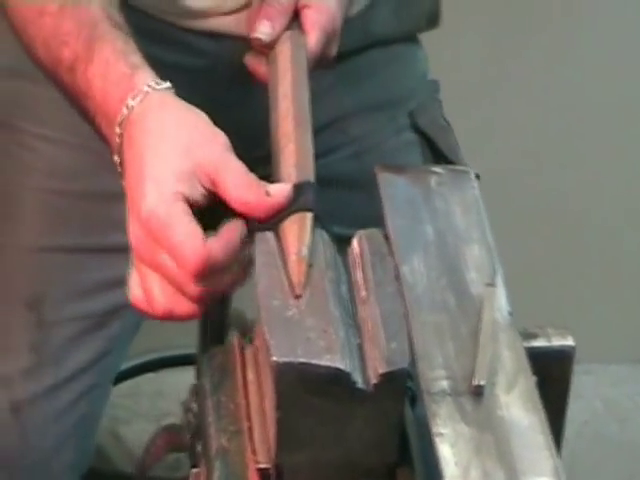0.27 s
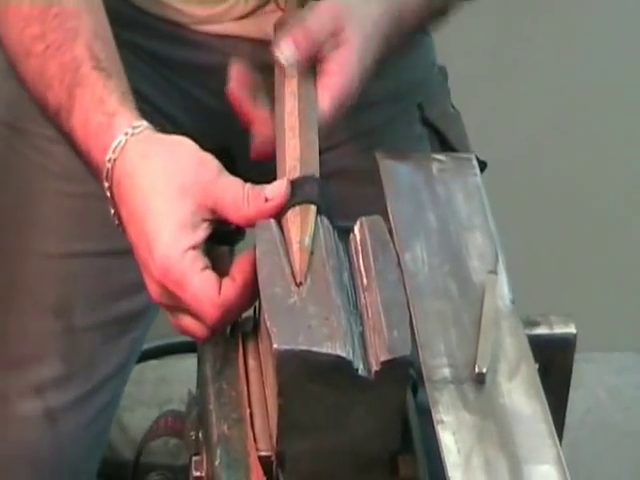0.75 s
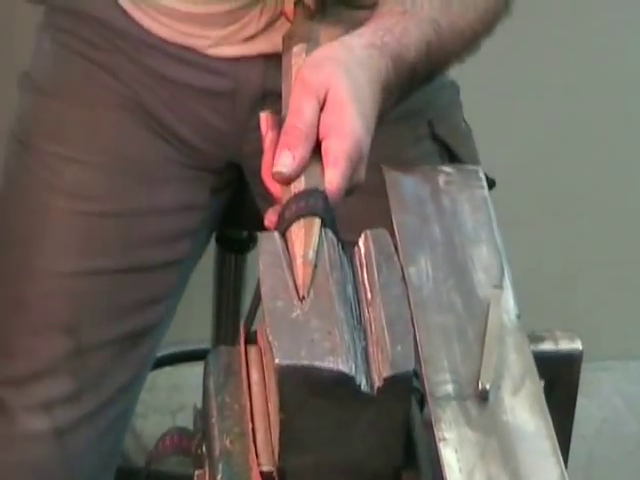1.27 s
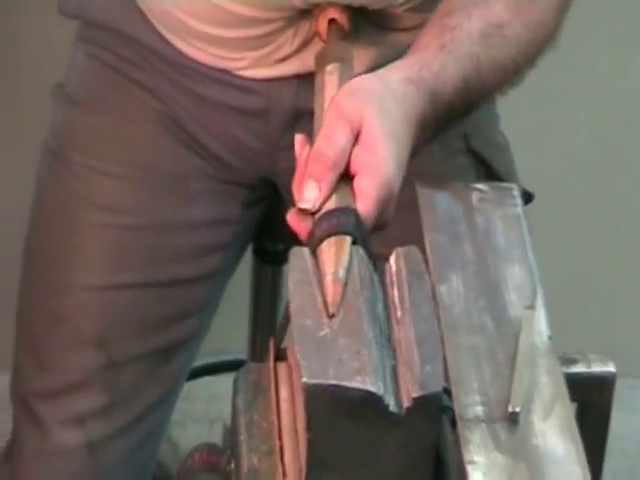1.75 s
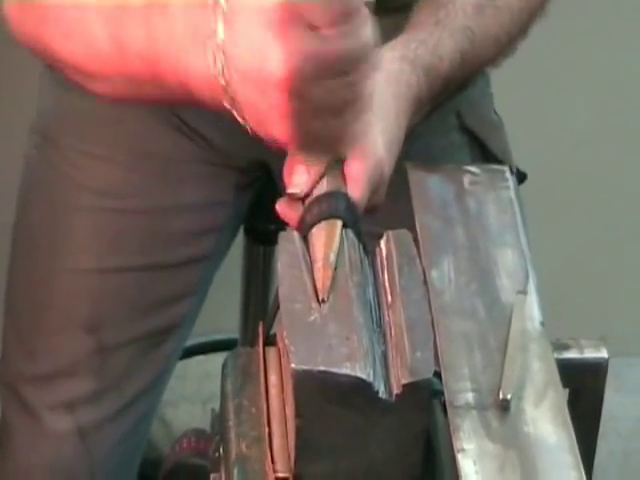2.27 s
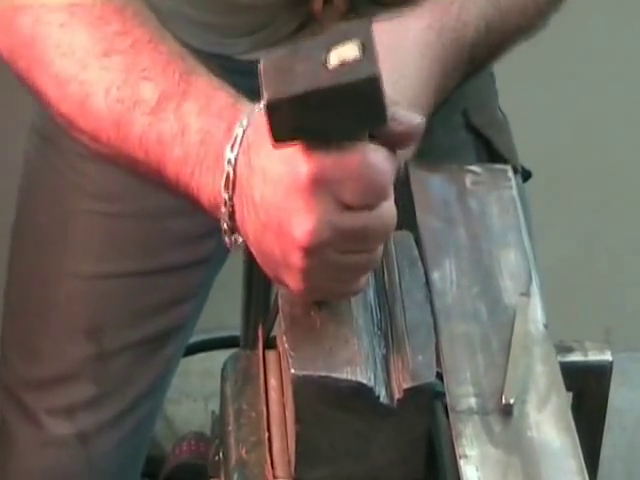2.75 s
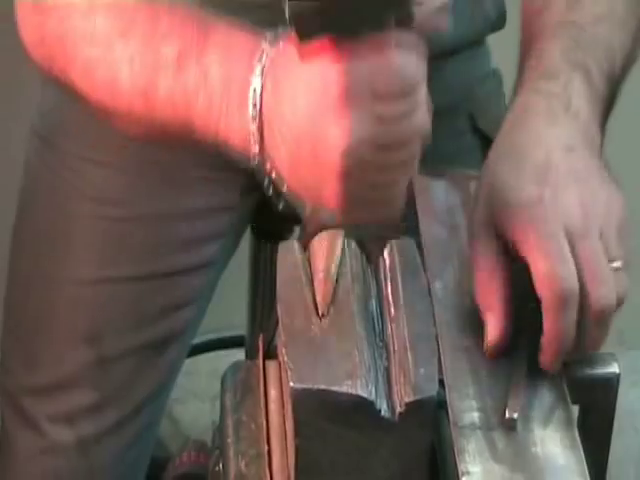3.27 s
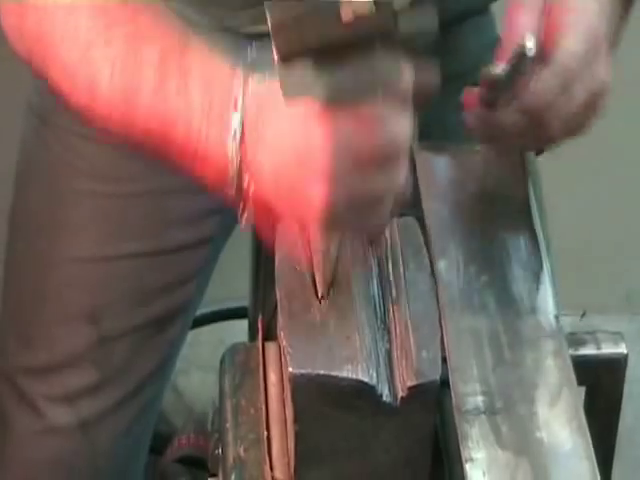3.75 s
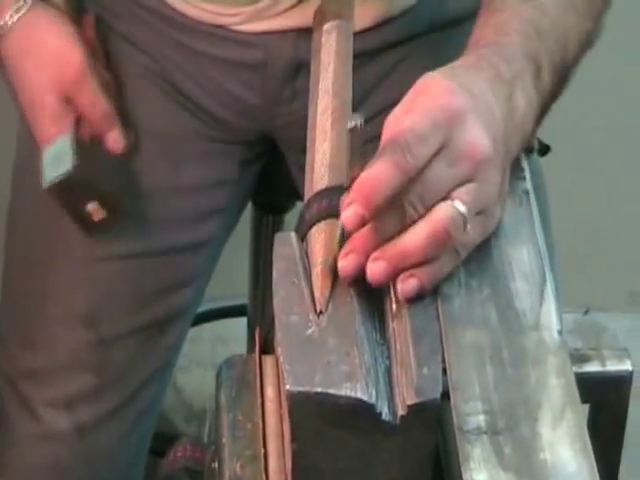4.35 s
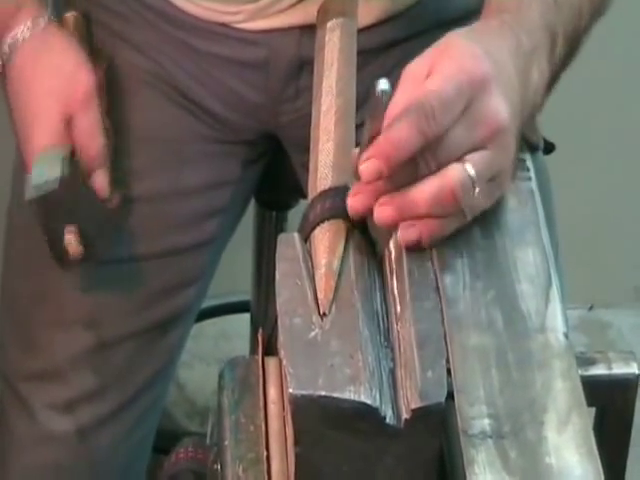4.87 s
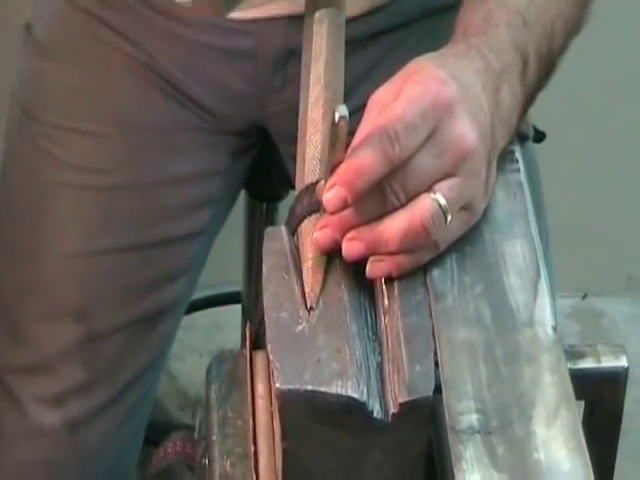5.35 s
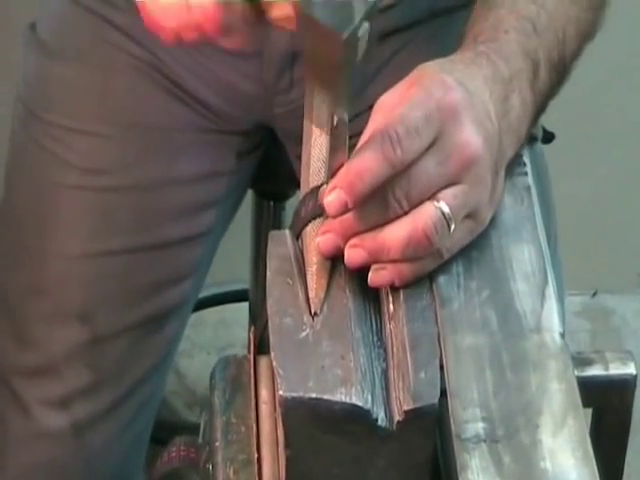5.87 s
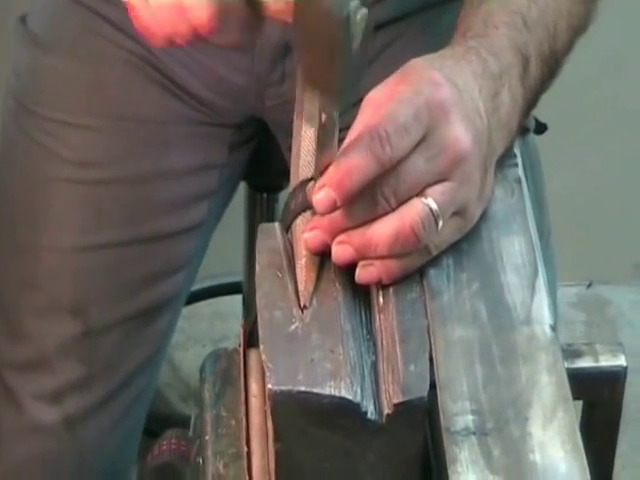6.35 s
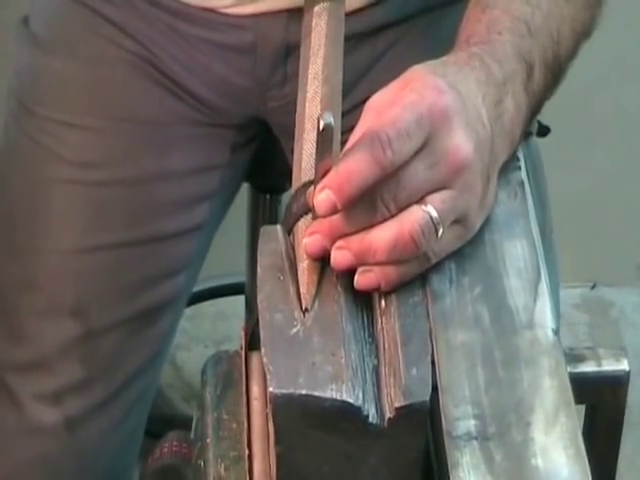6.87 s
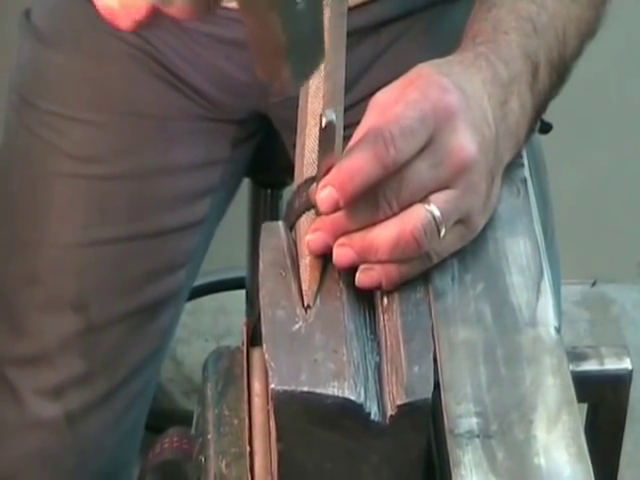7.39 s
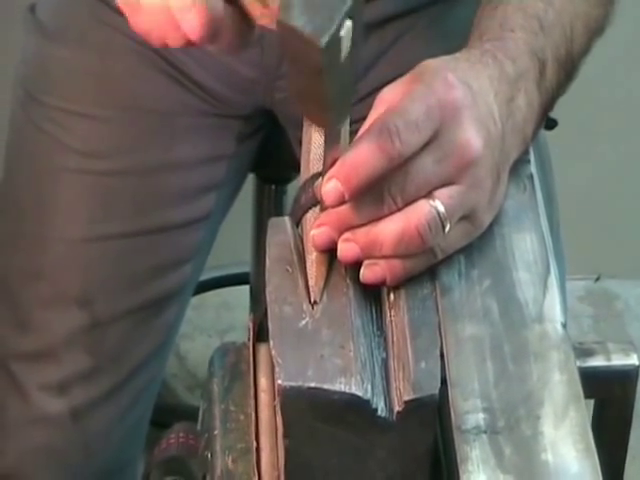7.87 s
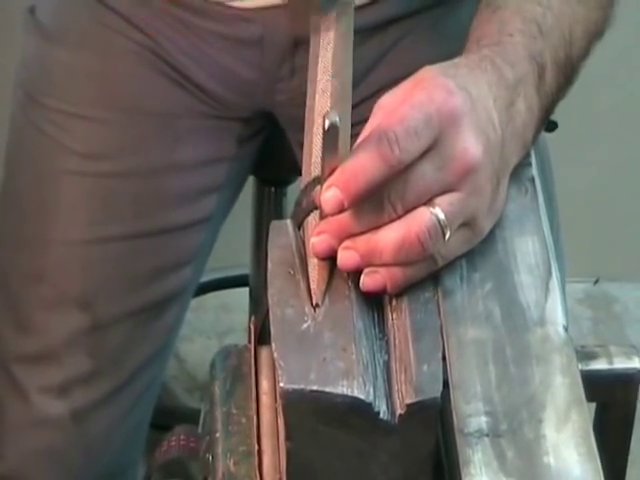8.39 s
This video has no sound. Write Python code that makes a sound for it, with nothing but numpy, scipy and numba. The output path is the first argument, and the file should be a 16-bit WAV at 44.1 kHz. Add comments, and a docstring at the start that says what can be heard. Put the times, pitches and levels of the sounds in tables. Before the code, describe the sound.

Close stereo microphone in a hard-walled room. Handling taps and a small bright clink come first, then one heavy dull knock and three quicker ones, with a thin metallic jingle behind the first two. A punch tip is set down softly. Two crisp strikes follow, a pause, then two more, the final one harshly overloaded, each answered by dense echo and a low thump from the far wall, over quiet hiss.

```python
"""A hard-walled workshop with steady room noise, hiss and a faint hum: first a soft burst and small taps, a
tool clink and a bumped bar. Four dull hammer knocks seat a steel bar on an anvil block; a loose punch jingles
after the first two, then is picked up. Its tip is set on the bar and it is struck four times, sharp and bright,
the last sent in far louder than the rest. Blows are shaped noise bursts plus decaying modes; the room is band-
shaped noise with one slap from the far wall. Last, a close microphone's limiter flattens the start of the
room's answer, and what it is too slow for clips."""
import sys
import numpy as np
from scipy import signal
from scipy.fft import rfft, irfft
from scipy.io import wavfile
from scipy.ndimage import uniform_filter1d
from numba import njit

SR = 44100
rng = np.random.default_rng(int(sys.argv[2]) if len(sys.argv) > 2 else 0)


def int16_out(signal):
    """Quantize to a 16-bit WAV file."""
    q = np.round(np.clip(np.atleast_2d(signal).T, -1, 1) * 32767)
    wavfile.write(sys.argv[1], SR, q.astype(np.int16))


N = 380141
TIME = np.arange(int(1.6 * SR)) / SR  # s, time axis of each single sound and of the echo
SOUND_END_S = 1.3  # flattened noise is silent after this


def undb(db):
    """Turn decibels into gain."""
    return 10 ** (np.asarray(db) / 20)


def unit(x):
    """Scale to rms 1."""
    return x / np.sqrt(np.mean(x ** 2))


def lookup(table, hz):
    """Read a spectrum in dB along a log-frequency axis."""
    rows = np.array(table, float)
    return np.interp(np.log(np.maximum(hz, 1)), np.log(rows[:, 0]), rows[:, 1])


def colour(x, gain_db):
    """Equalize with a curve given as a function from Hz to dB."""
    size = x.shape[-1]
    hz = np.maximum(np.fft.rfftfreq(size, 1 / SR), 1)
    return irfft(rfft(x) * undb(gain_db(hz)), size)


def fade(t60):
    """Exponential decay that falls 60 dB in t60 seconds."""
    return np.exp(-np.log(1000) * TIME / t60)


def add(track, s, sound):
    """Mix a sound into the track at time s."""
    start = max(int(s * SR), 0)
    part = sound[:N - start]
    track[start:start + len(part)] += part


def even(x, size):
    """Level the chance peaks and holes of a spectrum, judged over size bins, and cut the tail."""
    spectrum = rfft(x)
    channel_power = np.abs(np.atleast_2d(spectrum)) ** 2
    power = uniform_filter1d(np.mean(channel_power, axis=0), size)
    flat = irfft(spectrum / np.sqrt(np.abs(power) + 1e-9), len(TIME))
    return flat * (TIME < SOUND_END_S)


def ring(modes):
    """Sum decaying sine modes; each blow lands a little elsewhere and weights them anew."""
    scatter_db = 1.5 * rng.standard_normal(len(modes))
    out = np.zeros(len(TIME))
    for k, (hz, db, t60) in enumerate(modes):
        mode = fade(t60) * np.sin(2 * np.pi * hz * TIME)
        out += (-1) ** k * undb(db + scatter_db[k]) * mode
    return out


def crack(gain_db, t60):
    """The contact: a short burst of dense, heavily damped vibration with a smooth spectrum."""
    burst = rng.standard_normal(len(TIME)) * fade(t60)
    # flatten and shorten in turn, so the burst ends up both smooth and brief
    for _ in range(3):
        burst = even(burst, size=1) * (TIME < t60)
    burst = colour(burst, gain_db) * (TIME < 2 * t60)
    # same energy as the bare decay, whatever the colour
    return burst * np.linalg.norm(fade(t60)) / np.linalg.norm(burst)


# stereo spread of diffuse sound: (frequency [Hz], side minus mid [dB])
SPREAD = [(30, 4.5), (60, 4.5), (125, -1), (250, -8.5), (1000, -8), (3000, -7.5), (12000, -12)]


def stereo_noise(size):
    """Diffuse sound on two close ports: mostly alike, wider in the bass."""
    mid, side = rng.standard_normal((2, size))
    side = colour(side, lambda hz: lookup(SPREAD, hz))
    return np.array([mid + side, mid - side])


# spectrum of the room noise and hiss: (frequency [Hz], relative level [dB])
AIR_SPECTRUM = [(15, -64), (25, -6), (82, -4), (101, -13), (198, -3), (227, -14), (267, -1), (331, -15),
                (368, -7), (445, -16), (1000, -17), (1500, -23.5), (2700, -29), (6200, -27), (7000, -34),
                (10600, -32), (11200, -24), (12300, -36), (15500, -40)]
AIR_DB = -42.5  # rms
# faint steady tones: (frequency [Hz], rms level [dB])
HUM_TONES = [(265, -70.5), (372, -68), (399, -62), (496, -63), (3145, -70)]


def background():
    """Low steady room noise and hiss, made of shaped noise, with a faint hum of sines."""
    air = unit(colour(stereo_noise(N), lambda hz: lookup(AIR_SPECTRUM, hz)))
    t = np.arange(N) / SR
    hum = np.zeros(N)
    for hz, db in HUM_TONES:
        hum += undb(db) * np.sqrt(2) * np.sin(2 * np.pi * (hz * t + rng.random()))
    return undb(AIR_DB) * air + hum


# the walls absorb evenly, the bass lingers, and the air halves the ring time at AIR_HZ
WALL_T60_S, LINGER_HZ, AIR_HZ = 0.68, 64.6, 11400


def echo_t60(hz):
    """Ring time set by the walls, longer in the deep bass, shortened by the air in the treble."""
    bass = 1 + (LINGER_HZ / max(hz, LINGER_HZ)) ** 2
    return WALL_T60_S * bass / (1 + (hz / AIR_HZ) ** 2)


# shortest build-up time, approached in the treble, and the frequency below which it is doubled
BUILD_S, SLOW_BUILD_HZ = 0.0053, 150


def echo_build(hz):
    """Time the echoes take to pile up; long waves take longer."""
    return BUILD_S * (1 + SLOW_BUILD_HZ / max(hz, SLOW_BUILD_HZ))


# colour of the workshop's echo: (frequency [Hz], level [dB])
ECHO_COLOUR = [(50, -2.5), (90, -1), (127, 4.5), (285, 2), (556, -1.5), (1620, 6), (3700, -2), (6940, -3.5),
               (10500, -2), (15600, -14.5)]
FAR_WALL_S, FAR_WALL_DB, FAR_WALL_BAND_HZ = .057, 2, [110, 240]


def workshop(x):
    """Dense echoes in half-octave bands: the bass builds late and stays; the far wall sends back one thump."""
    noise = rfft(stereo_noise(len(TIME)))
    bins_hz = np.maximum(np.fft.rfftfreq(len(TIME), 1 / SR), 1)
    response = np.zeros((2, len(TIME)))
    for hz in 31 * 2 ** (np.arange(20) / 2):
        window = np.clip(1 - 2 * np.abs(np.log2(bins_hz / hz)), 0, 1)
        band = irfft(noise * window, len(TIME))
        # so many paths overlap that the energy of a band dies away steadily
        power = uniform_filter1d(np.mean(band ** 2, axis=0), size=2600)
        band = band * np.sqrt(power.mean() / power)
        build = 1 - np.exp(-(TIME / echo_build(hz)) ** 2)
        response += band * fade(echo_t60(hz)) * build
    response = colour(even(response, size=64), lambda hz: lookup(ECHO_COLOUR, hz))
    response = response * (TIME < SOUND_END_S)
    slap = signal.unit_impulse(len(TIME), int(FAR_WALL_S * SR))
    thump = signal.butter(2, FAR_WALL_BAND_HZ, "band", fs=SR, output="sos")
    response += undb(FAR_WALL_DB) * signal.sosfilt(thump, slap)
    return signal.fftconvolve(x[None], response, axes=1)[:, :N]


# a soft noise burst at the very start, then small taps of tools and fingers: (time [s], level [dB], centre
# [Hz], width [octaves])
SOFT_BURSTS = [(0.002, -31, 450, .45), (0.109, -33, 1690, 1), (0.284, -28, 3920, 0.44),
               (0.905, -33.5, 1540, 0.68), (1.068, -30, 696, 1.23), (1.115, -27.5, 350, 1.12),
               (4.321, -24, 320, 1.02)]
TAP_RISE_S, TAP_T60_S = 0.016, 0.07  # the rise comes within 60 dB of full in TAP_RISE_S


def soft_bursts():
    """Soft noise bursts around one centre pitch, with a rounded onset."""
    out = np.zeros(N)
    for s, db, centre_hz, octaves in SOFT_BURSTS:
        def hump(hz):
            return -14 * np.log10(1 + (np.log2(hz / centre_hz) / octaves) ** 4)
        tap = crack(hump, t60=TAP_T60_S)
        add(out, s, undb(db) * tap * (1 - fade(TAP_RISE_S)))
    return out


# modes of the tool: (frequency [Hz], relative level [dB], t60 [s])
TOOL_MODES = [(1238, -8, .5), (1675, -10, .25), (1795, -8, .22), (2067, -14, .3), (2201, -4, .45),
              (2313, 0, .27), (4003, 0, .2), (4076, 1, .16), (4877, -7, .28), (5830, 2, .12),
              (6950, -10, .15), (8489, -16, .25)]
# contact spectrum of the tool: (frequency [Hz], relative level [dB])
TOOL_CONTACT = [(300, -23), (1000, -13.5), (1700, -2.5), (2400, 2.5), (3100, -12), (4500, -1), (6000, -9),
                (8000, -13), (15000, -16)]
# modes of the bumped bar: (frequency [Hz], relative level [dB], t60 [s])
BUMP_MODES = [(150, -4, 0.093), (201, -8.5, 0.16), (305, 4.5, 0.046), (367, -8, 0.031)]
# modes of the loose punch: (frequency [Hz], relative level [dB], t60 [s] before any settling)
PUNCH_LOOSE_MODES = [(3431, -1, .37), (4344, -15, .5), (5456, -6, .14), (5970, -9, .25), (6142, 0, .22),
                     (6302, -5, .28), (7068, -14, .3), (7635, -13, .25), (8540, -9, .18), (9275, -9, .12),
                     (10650, -9, .2), (13400, -2, .2)]
CLINK_S, BUMP_S, LIFT_S = 0.427, 1.470, 3.440  # tool clinks, bar is bumped, punch is picked up
# modes of the punch tip: (frequency [Hz], relative level [dB], t60 [s])
TIP_MODES = [(763, -2, 0.11), (790, 5.5, 0.15), (5700, 3, 0.011)]
# the tip is set on the bar: (time [s], level [dB])
TIP_TOUCHES = [(4.315, -35), (7.298, -43)]


def handling():
    """A tool clinks as it is put down, the bar is bumped, the punch is picked up and its tip set: modes and bursts."""
    out = soft_bursts()
    scrape = crack(lambda hz: lookup(TOOL_CONTACT, hz), t60=.02)
    add(out, CLINK_S, undb(-29.5) * ring(TOOL_MODES) + undb(-13.5) * scrape)
    add(out, BUMP_S, undb(-21.0) * ring(BUMP_MODES) * (1 - fade(0.009)))
    tick = crack(lambda hz: lookup(STRIKE_CONTACT, hz), t60=.025)
    add(out, LIFT_S, undb(-21.5) * ring(PUNCH_LOOSE_MODES) + undb(-14) * tick)
    for s, db in TIP_TOUCHES:
        add(out, s, undb(db) * ring(TIP_MODES))
    return out


# modes of the stand: (frequency [Hz], relative level [dB], t60 [s])
STAND_MODES = [(120, -2, .07), (160, -2.5, .07), (204, -3, .08), (318, 0, .12), (452, -6, .09),
               (528, -4.5, .1), (700, -7.5, .04), (795, -10, .07)]
KNOCK_PUSH_DB, STRIKE_PUSH_DB = -4, 1  # how hard each kind of blow shakes the stand


def stand():
    """Every blow shakes the stand under the anvil; the short contact of the punch pushes its lowest modes less."""
    out = np.zeros(N)
    kinds = [(KNOCK_BLOWS, KNOCK_PUSH_DB, 90), (PUNCH_BLOWS, STRIKE_PUSH_DB, 270)]
    for blows, push_db, lowest_hz in kinds:
        low_cut = signal.butter(2, lowest_hz, "high", fs=SR, output="sos")
        for s, db, *_ in blows:
            boom = signal.sosfilt(low_cut, ring(STAND_MODES))
            add(out, s, undb(db + push_db) * boom)
    return out


# hammer on the bar: (time [s], level [dB], contact brightness [dB per octave])
KNOCK_BLOWS = [(2.476, 0, 3.5), (3.168, 2, 4), (3.532, -1, 2.13), (3.872, -1, 3.5)]
# contact spectrum before the brightness tilt: (frequency [Hz], relative level [dB])
KNOCK_CONTACT = [(100, -22), (400, 16), (750, 20.5), (1400, 10), (2200, 1.5), (3300, 4), (5000, 3),
                 (7000, -5), (10000, -6.5), (13000, -11), (15500, -14)]
# modes of the bar: (frequency [Hz], relative level [dB], t60 [s])
BAR_MODES = [(980, -21, .45), (1064, -28, .25), (1302, -30, .3), (1542, -26, .25), (1854, -28, .35),
             (2002, -28, .15), (2175, -28, .2), (2400, -27, .2), (2767, -31, .45), (3822, -29, .25)]
# the loose punch lands just after a knock
JINGLE_DB, JINGLE_DELAY_S, JINGLE_T60_S = -11, 0.02, 0.14
JINGLE_TILT_DB, PUNCH_MID_HZ = 4, 6000  # dB per octave about the middle of its modes


def knocks():
    """Dull blows ring the bar; until picked up, the loose punch jumps and jingles, damped as it settles."""
    out = np.zeros(N)
    jingle = []
    for hz, db, t60 in PUNCH_LOOSE_MODES:
        jingle.append((hz, db + JINGLE_TILT_DB * np.log2(hz / PUNCH_MID_HZ), t60))
    for s, db, tilt_db in KNOCK_BLOWS:
        def brightness(hz):
            return lookup(KNOCK_CONTACT, hz) + tilt_db * np.log2(hz / 2000)
        contact = crack(brightness, t60=0.019)
        add(out, s, undb(db) * (undb(5.5) * contact + undb(-6.5) * ring(BAR_MODES)))
        if s < LIFT_S:
            settling = ring(jingle) * fade(JINGLE_T60_S)
            add(out, s + JINGLE_DELAY_S, undb(db + JINGLE_DB) * settling)
    return out


# hammer on the punch: (time [s], level [dB])
PUNCH_BLOWS = [(5.988, 2.5), (6.4603, 3.5), (7.9638, 3.5), (8.3339, 22)]
# contact spectrum before any tilt: (frequency [Hz], relative level [dB])
STRIKE_CONTACT = [(100, 2), (400, 0), (800, 9), (1400, -1.5), (2000, 1.5), (2700, 0.5), (4500, 2),
                  (6500, 7), (8000, 2), (9000, -4.5), (12000, 0.5), (15500, -6)]
STRIKE_TILT_DB = 2.43  # per octave
# modes of the hand-held punch: (frequency [Hz], relative level [dB], t60 [s])
PUNCH_HELD_MODES = [(5000, 6, .006), (6270, 2, .02), (6700, 8, .014), (7300, -2, .012), (11000, -11, .024)]


def strikes():
    """Steel on steel: the fingers damp the punch at once, so its modes are brief; the bar rings on."""
    out = np.zeros(N)
    for s, db in PUNCH_BLOWS:
        def brightness(hz):
            return lookup(STRIKE_CONTACT, hz) + STRIKE_TILT_DB * np.log2(hz / 4000)
        contact = crack(brightness, t60=0.024)
        punch = undb(9.0) * contact + undb(-8.5) * ring(PUNCH_HELD_MODES)
        add(out, s, undb(db) * (punch + ring(BAR_MODES)))
    return out


def scene():
    """The steel faces the microphone; the stand radiates sideways and is heard mostly through the room."""
    steel, boom, small = knocks() + strikes(), stand(), handling()
    direct = steel + undb(-15) * boom + small
    return direct + workshop(steel + boom + small) + background()


@njit
def follow(x, attack, release):
    """Level detector that rises quickly and falls slowly."""
    out, level = np.empty(len(x)), 0.
    for i in range(len(x)):
        level += (x[i] - level) * (attack if x[i] > level else release)
        out[i] = level
    return out


# tilt between the ports: (frequency [Hz], left minus right [dB])
PORT_TILT = [(60, 2.5), (125, 2), (250, 1), (500, .4), (4000, -.4), (10000, .8)]
PORT_LAG_S, TOP_HZ = 2.9e-5, 15700  # right port's delay, upper edge of the microphone
ATTACK_S, RELEASE_S = .004, .055  # time constants of the limiter


def record(dry, ceiling_db=-9):
    """Sound reaches the left port first; the limiter is too slow for the cracks, so they clip."""
    late = np.exp(-2j * np.pi * np.fft.rfftfreq(N, 1 / SR) * PORT_LAG_S)
    delayed = irfft(rfft(dry[1]) * late, N)
    left = colour(dry[0], lambda hz: lookup(PORT_TILT, hz) / 2)
    right = colour(delayed, lambda hz: -lookup(PORT_TILT, hz) / 2)
    ports = np.array([left, right])
    # the louder port turns both down
    loudest = np.abs(ports).max(axis=0)
    envelope = follow(loudest, 1 / (ATTACK_S * SR), 1 / (RELEASE_S * SR))
    reduction = np.maximum(envelope / undb(ceiling_db), 1)
    limited = np.clip(ports / reduction, -1, 1)
    top_cut = signal.ellip(8, .2, 70, TOP_HZ, fs=SR, output="sos")
    return signal.sosfilt(top_cut, limited)


dry = scene()
out = record(dry)
int16_out(out)
```